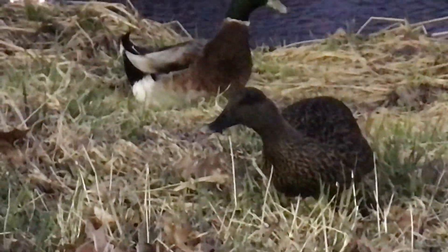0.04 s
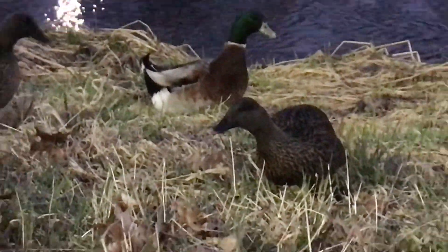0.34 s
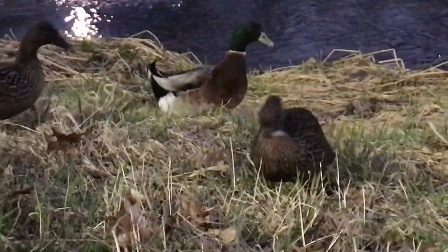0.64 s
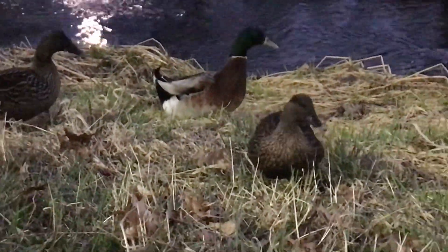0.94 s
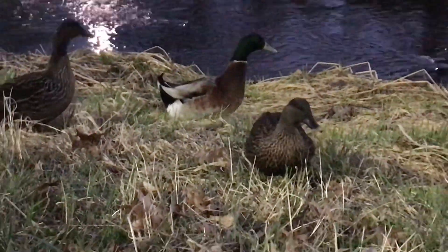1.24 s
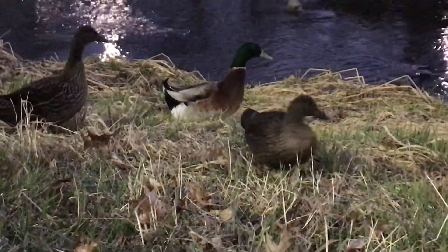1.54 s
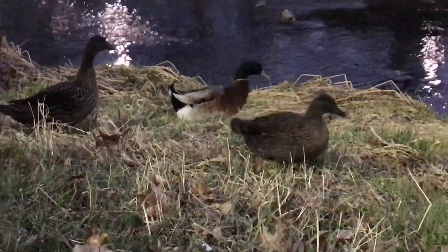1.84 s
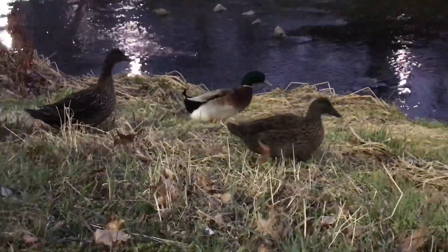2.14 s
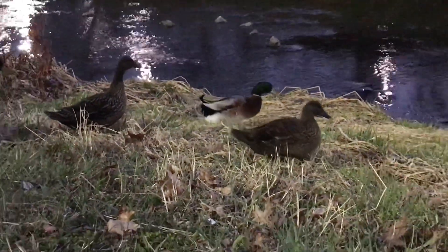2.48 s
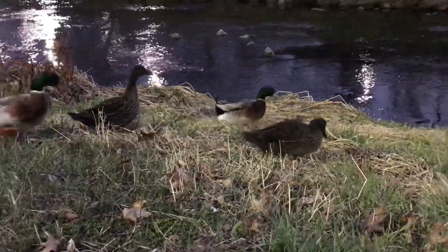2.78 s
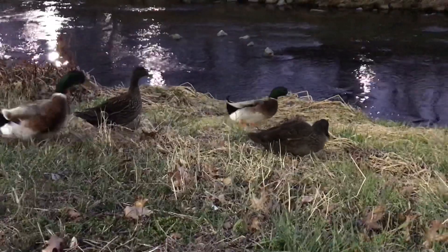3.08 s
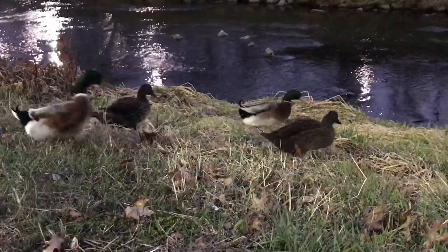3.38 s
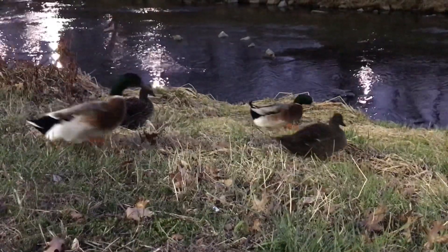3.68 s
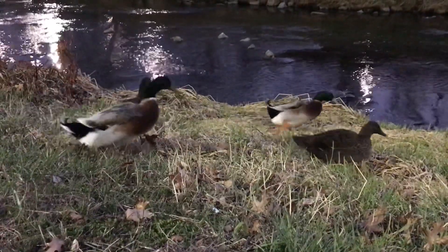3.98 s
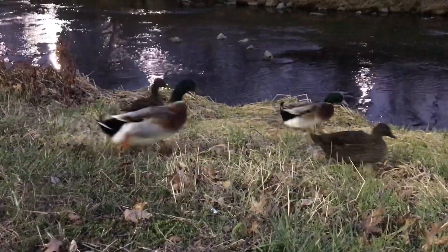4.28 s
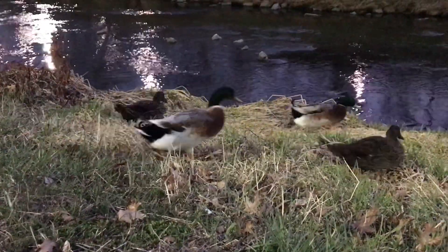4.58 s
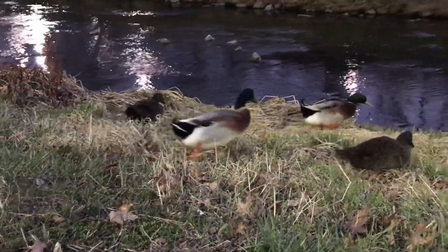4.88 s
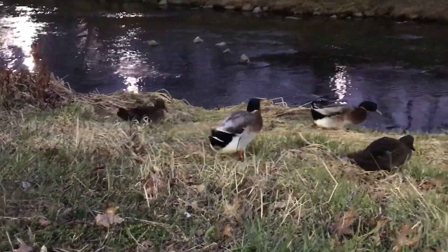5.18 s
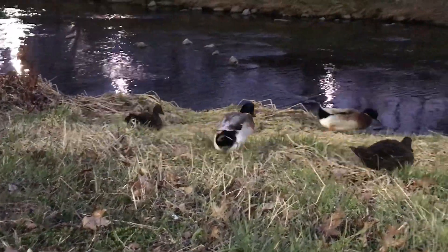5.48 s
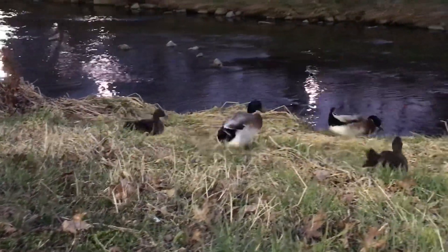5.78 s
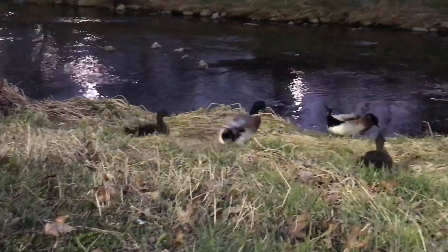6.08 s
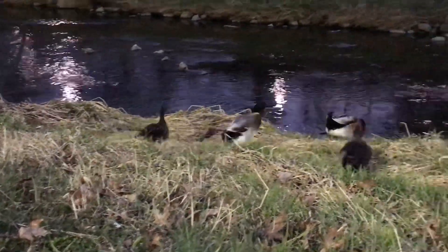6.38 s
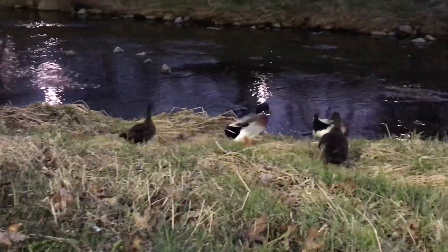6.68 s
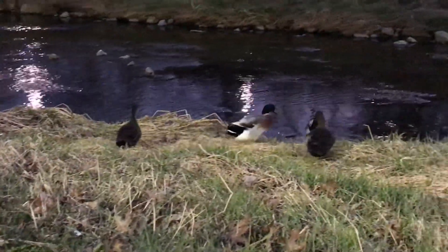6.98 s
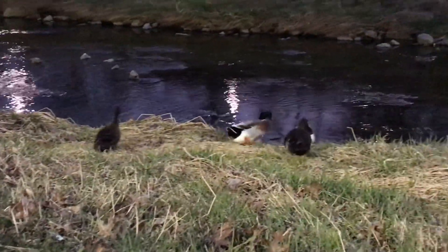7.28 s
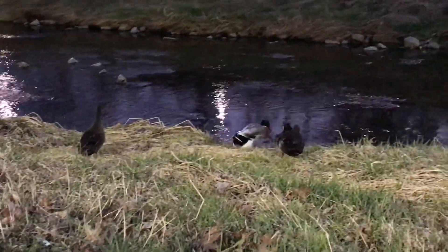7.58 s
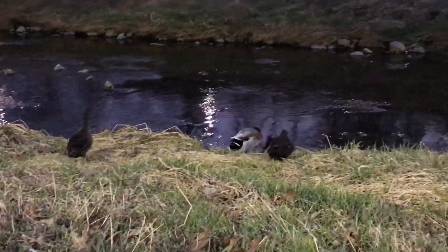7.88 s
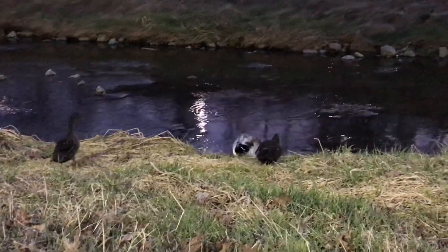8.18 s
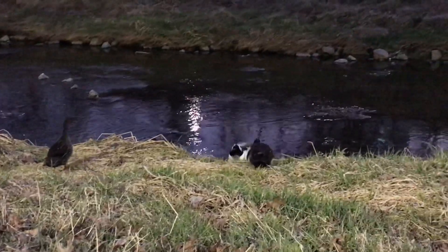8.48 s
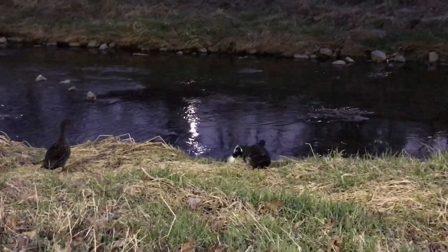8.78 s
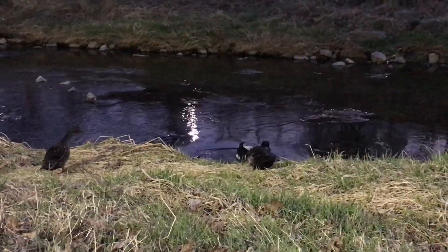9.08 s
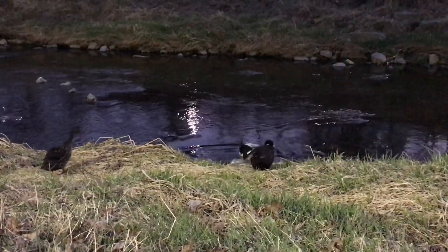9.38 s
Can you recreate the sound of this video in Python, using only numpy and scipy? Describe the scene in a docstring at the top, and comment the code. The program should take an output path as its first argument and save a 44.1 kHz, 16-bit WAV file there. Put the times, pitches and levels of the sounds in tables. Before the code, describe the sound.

A stream murmurs under a low outdoor rumble for the whole nine seconds or so, both easing slightly. At the start a far engine drones beneath a thin hiss; it fades out by about 3.6 seconds, and the hiss then drops back. Dry grass rustles and stalks snap as ducks walk about. From around 0.4 seconds the ducks give short, rattling, nasal clucks at uneven intervals, mixed with soft peeps, most with a low note and an overlapping higher one. Small birds chip faintly between 1 and 2 seconds and again from about 6 seconds. Steps and clucks are strongest around 4 to 5 seconds, with the sharpest snap just after 4 seconds and a few soft bumps near 4.5. After 6 seconds the rustling thins out, and the clucks and peeps grow quieter toward the end.

```python
"""Mallards chat on a grassy stream bank, over murmuring water and a low outdoor rumble.
At first a far engine drones under a thin hiss, dry grass rustles and snaps as the ducks walk, and
they start to call: clucks (quick rattles of tiny whistles) and soft peeps, most with two voices.
From about 1 s small birds chip now and then. The engine fades out by 3.6 s, then the hiss eases.
Steps and clucks are strongest around 4 to 5 s and grow quieter toward the end."""
import sys
import numpy as np
from scipy import signal
from scipy.fft import rfft, irfft, next_fast_len
from scipy.io import wavfile
from scipy.ndimage import uniform_filter1d, map_coordinates

SR = 44100
rng = np.random.default_rng(int(sys.argv[2]) if len(sys.argv) > 2 else 0)


def int16_out(signal):
    """Quantize to a 16-bit WAV file."""
    q = np.round(np.clip(np.atleast_2d(signal).T, -1, 1) * 32767)
    wavfile.write(sys.argv[1], SR, q.astype(np.int16))


N = 416289


# each cluck: (middle [s], rough length [s], relative level [dB], centre pitch [Hz], nasal boost [dB])
CLUCKS = [(0.436, 0.058, -51.5, 2400, -7.5), (0.937, 0.059, -46, 2190, -10),
          (1.183, 0.057, -43.5, 2424, -10), (1.913, 0.038, -47, 1904, -9), (2.473, 0.077, -45.5, 1912, -17),
          (2.56, .16, -50, 1890, -15), (2.704, .07, -39, 2560, -16), (3.244, 0.06, -44.5, 2360, -16),
          (3.354, .045, -45.5, 2140, -25), (3.63, 0.07, -41.5, 2083, -19), (3.866, .072, -41.5, 1910, -13),
          (4.153, .045, -47.5, 1885, -20), (4.308, 0.048, -41, 1920, -12), (4.407, 0.062, -45, 2270, -9),
          (4.554, 0.077, -40, 1953, -12), (4.912, .065, -41.5, 1948, -8), (4.975, 0.062, -41, 1960, -14),
          (5.157, 0.059, -42, 1936, -3.5), (5.209, 0.087, -42, 2000, -16), (5.601, 0.066, -45.5, 2200, -18),
          (5.662, 0.037, -48, 1910, -6), (5.829, 0.08, -44, 2050, -10), (5.909, .058, -49.5, 1976, 0.5),
          (6.179, 0.067, -45, 1925, -15), (6.411, 0.068, -41.5, 1990, -17), (6.668, .066, -49.5, 2275, -11),
          (6.821, 0.072, -46, 1940, -11.5), (7.055, 0.075, -45.5, 2036, -24),
          (7.454, 0.06, -49.5, 1890, -10), (7.701, 0.053, -48, 1906, -11), (8.054, .035, -54, 2010, -10),
          (8.419, 0.034, -53, 1956, -17), (8.856, 0.1, -52.5, 1927, -11)]
# how a duck's throat and bill colour a cluck: (frequency [Hz], level [dB])
THROAT = [(600, -32), (1200, 1.5), (1600, 7), (2000, 1.5), (2400, 0), (2900, 0), (3400, -5.5), (3900, -3),
          (4600, -25), (6500, -34), (10000, -45)]
# the high, nasal ring of a cluck: (frequency [Hz], level [dB])
NASAL_RING = [(2000, -27), (3200, -2.5), (3900, -3.5), (4700, -2), (5100, -1), (5400, 1), (5800, -4),
              (6300, -10), (7500, -26), (12000, -40)]
def clucks(pulses_per_s=87, sweep_octaves=0.88, rasp=0.46, gain_db=-6.5, nasal_db=-4):
    """The duck's voice box opens about 90 times a second; each opening is a tiny rising whistle."""
    out = np.zeros(N)
    usual_hz = np.median(np.array(CLUCKS)[:, 3])
    for middle, length, db, hz, ring_db in CLUCKS:
        rate = pulses_per_s * (1 + .03 * rng.standard_normal())
        half = int(.72 * length * SR)
        t = np.arange(-half, half) / SR
        n = len(t)
        effort = np.cos(np.pi * t / (t[-1] - t[0])).clip(0)
        # each pulse opens faster than it closes, and no two are quite alike
        cycle = (t * rate + .5 + .07 * wobble(90, n)) % 1
        opening = np.sin(np.pi * cycle ** .87) ** .96 * amp(2.6 * wobble(138, n))
        # higher calls sweep further; more effort tightens the voice box and lifts the pitch
        sweep = sweep_octaves * hz / usual_hz * (cycle - .45)
        lift = .294 * (effort - .7)
        shake = .0897 * wobble(109.2, n) + .081 * wobble(443, n)
        phase = turns(hz * 2 ** (sweep + lift + shake))
        # higher calls come from a wider bill, which makes the throat ring higher
        throat = np.array(THROAT) * [(hz / usual_hz) ** .13, 1]
        breath = unit(coloured(rng.standard_normal(n), throat))
        body = unit(coloured((np.sin(phase) + rasp * breath) * opening * effort ** 1.4, throat))
        # an overtone and rushing air ring high in the bill at the peak of the call
        airy_tone = .14 * np.sin(2 * phase) + rng.standard_normal(n)
        ring = unit(coloured(airy_tone * opening ** .98 * effort ** 2.3, NASAL_RING))
        add(out, middle + t[0], amp(db + gain_db) * (body + amp(ring_db + nasal_db) * ring))
    return out


# two-voiced peeps: (start [s], low note's rough length [s], its pitch [Hz], its relative level [dB],
# high note's relative level [dB], brightness [dB per octave])
PEEPS = [(.675, 0.05, 840, -59, -58, -8), (2.13, 0.055, 855, -51.5, -50.5, -2.5),
         (2.705, 0.051, 883, -50.5, -52, -2), (2.993, .063, 877, -48.5, -49, -1.5),
         (3.356, 0.053, 937, -52.5, -51, 7), (3.921, 0.053, 865, -52.5, -56, 0.5),
         (4.452, 0.065, 925, -51, -54, 4), (4.793, 0.053, 950, -58, -53.5, 12),
         (5.271, 0.057, 910, -57, -53, 9), (7.357, 0.055, 846, -54, -53.5, -1),
         (7.648, 0.062, 832, -52.5, -61, -1), (7.999, 0.057, 875, -52, -61, 2),
         (8.352, 0.058, 860, -54, -57, 2.5), (8.749, .048, 860, -57, -55, 3),
         (9.06, 0.064, 840, -57.5, -59.5, 3)]
# one voice alone:
# (start [s], rough length [s], pitch [Hz], relative level [dB], brightness [dB per octave])
LONE_PEEPS = [(1.584, 0.04, 849, -59, -11), (1.845, .068, 1015, -48, -6), (5.971, 0.036, 1053, -56, 0),
              (6.876, 0.058, 898, -51, 1)]
def peeps(high_hz=1190):
    """One side of the voice box sings and the other joins late and higher; sometimes one sings alone."""
    # pitch at the start, middle and end of a note, as multiples of its own pitch
    rising, arched, flat = (.945, 1, 1.045), (.86, 1, .77), (1.03, 1, .985)
    out = np.zeros(N)
    for start, length, hz, low_db, high_db, brightness in PEEPS:
        add(out, start, peep_note(length, hz, rising, low_db, brightness))
        add(out, start + .7 * length, peep_note(.82 * length, high_hz, arched, high_db, brightness))
    for start, length, hz, db, brightness in LONE_PEEPS:
        add(out, start, peep_note(length, hz, flat, db, brightness))
    return out


# how the nearly closed bill colours a peep: (frequency [Hz], level [dB])
BILL = [(700, -25), (870, -7.5), (1150, 1), (1750, 0), (2350, -5), (2650, -8.5), (3500, -22.5), (4700, -42)]
def peep_note(length, hz, shape, db, brightness, rattle_hz=95, flutter_db=3, pivot_hz=1660):
    """One whistle and its overtones (multiples of its pitch) pass through the bill."""
    n = int(1.08 * length * SR)
    progress = np.linspace(0, 1, n)
    pitch = hz * np.polyval(np.polyfit([0, .5, 1], shape, 2), 1.08 * progress)
    # as the air runs out, the note sags, grows hoarse and breaks into a rattle
    tiring = progress ** 4
    sag = 1 - .216 * tiring ** 2
    rattle = .53 * tiring * np.sin(turns(rattle_hz * (1 + .11 * wobble(51, n))))
    waver = .014 * wobble(210, n)
    hoarseness = .038 * tiring * wobble(950, n)
    phase = turns(pitch * sag * (1 + waver + hoarseness + .18 * rattle))
    tone = np.zeros(n)
    for k in range(1, 5):
        tone += amp(along(BILL, k * hz) + brightness * np.log2(k * hz / pivot_hz)) * np.sin(k * phase)
    swell = np.abs(np.sin(np.pi * progress)) ** .5 * amp(db + flutter_db * wobble(140, n))
    return np.sqrt(2) * tone * swell * (1 + rattle)


# the tone colour of dry grass: (frequency [Hz], level [dB])
DRY_GRASS = [(1470, -29), (2500, -6), (3060, -1.5), (4220, -1.5), (4890, -5), (5240, -2.5), (7250, -1),
             (7650, -3.5), (9210, -0.5), (10300, -2.5), (12800, -2), (15800, -5.5)]
def grass(cracks_per_s=800, gain_db=2):
    """Blades brush in a hiss while tiny cracks, each with its own pitch, run through the straw."""
    t = np.arange(64) / SR
    when, pitch, size = rng.random((int(cracks_per_s * N / SR), 3)).T[:, :, None]
    hz = 4500 + 11000 * pitch
    strength = amp(-6 * np.log(size + .021))  # many faint cracks, a few loud ones
    cracks = strength * np.sin(2 * np.pi * hz * t) * np.exp(-t * hz / 2)
    positions = (when * N).astype(int) + np.arange(len(t))
    crackle = np.bincount(positions.ravel(), cracks.ravel(), N)[:N]
    rustle = .84 * unit(crackle) + 2.12 * rng.standard_normal(N)
    flicker = amp(1.7 * wobble(70))
    return amp(gain_db) * treading() * unit(coloured(rustle * flicker, DRY_GRASS))


# steps and shuffles: (loudest moment [s], rough length [s], relative level [dB])
STEPS = [(0.11, 0.13, -62.5), (.89, 0.13, -65), (1.096, 0.069, -64), (1.365, 0.22, -61.5),
         (2.11, 0.24, -66), (2.427, .16, -67), (2.89, 0.15, -60.5), (3.353, 0.22, -58.5),
         (3.544, 0.17, -56), (3.729, 0.15, -54), (4.059, 0.09, -51), (4.128, 0.15, -52),
         (4.398, 0.12, -51.5), (4.49, 0.11, -52.5), (4.8, 0.18, -54.5), (4.93, 0.15, -55.5),
         (5.052, .09, -55), (5.318, 0.33, -59), (5.568, 0.17, -53), (5.816, 0.14, -57.5), (6.23, 0.14, -68),
         (6.453, 0.11, -64.5), (6.58, .17, -64), (6.868, 0.066, -63), (7.022, 0.22, -69), (8.32, .1, -68)]
# the flock's constant stirring in the grass: (time [s], relative level [dB])
STIRRING = [(0, -64.5), (.75, -73.5), (1.6, -65.5), (2.25, -72), (2.65, -67), (4, -65), (4.7, -57.5),
            (5.45, -62), (6.05, -63.5), (7.25, -66), (8.1, -73.5), (9.44, -75)]
def treading(press_share=0.26, settle_share=0.7):
    """How hard the grass is stirred: each foot presses down quickly, then the straw settles."""
    t = np.arange(N) / SR
    stir_db, = curves(STIRRING)
    power = amp(stir_db) ** 2
    for peak, length, db in STEPS:
        width = length * np.where(t < peak, press_share, settle_share)
        step = amp(db) * np.exp(-((t - peak) / width) ** 2)
        power += step ** 2
    return np.sqrt(power)


# breaking stalks: (time [s], relative level [dB], ring pitch [Hz])
SNAPS = [(0.0983, -31.5, 4130), (.182, -33.5, 4630), (.2585, -38.5, 11600), (0.3464, -42, 2980),
         (.5, -35, 2640), (0.5624, -35, 3960), (.597, -42, 3060), (.884, -37, 3072), (1.289, -38, 2820),
         (1.4316, -28.5, 12300), (1.6538, -30.5, 2700), (2.88, -34, 12300), (2.9637, -33, 4600),
         (3.333, -35, 12000), (3.7736, -26.5, 12200), (4.129, -27, 12800), (4.144, -19, 12600),
         (4.181, -29, 7090), (4.417, -25, 3900), (4.9473, -26.5, 2890), (5.521, -27, 3670),
         (5.5943, -30, 9590), (7.1442, -39, 7150), (9.205, -44, 2570)]
def snaps(crack_s=0.0057, tail_s=0.022, gain_db=-3):
    """A stalk breaks with a sharp crack and a very brief ring."""
    out = np.zeros(N)
    t = np.arange(SR // 25) / SR
    for start, db, hz in SNAPS:
        burst = rng.standard_normal(len(t)) * (amp(-60 * t / crack_s) + .24 * amp(-60 * t / tail_s))
        crack = signal.lfilter(*signal.butter(2, 2300, "high", fs=SR), burst)
        ring = signal.lfilter(*signal.iirpeak(hz, Q=4, fs=SR), burst)
        snap = unit(crack) + .59 * unit(ring)
        add(out, start, amp(db + gain_db) * snap / np.abs(snap).max())
    return out


# low bumps: (start [s], length [s], first pitch [Hz], last pitch [Hz], level [dB], pitch shake [share])
BUMPS = [(.3, 0.243, 61, 62.6, -38.5, .05), (4.468, 0.024, 193, 131, -36, 0.35),
         (4.51, 0.037, 106, 124, -35.5, 0.15), (4.51, 0.031, 253, 222, -39, 0.37),
         (7.775, 0.053, 242, 416, -48.5, 0.033)]
def bumps():
    """Soft bumps and plops: short, low tones that slide in pitch."""
    return glides(BUMPS)


# bird calls: (start [s], length [s], first pitch [Hz], last pitch [Hz], level [dB], pitch shake [share])
BIRD_CHIPS = [(1.2, 0.074, 3150, 3100, -59, 0.0091), (1.3, 0.16, 3560, 3700, -62, 0.034),
              (1.41, 0.12, 2120, 2080, -56.5, 0.033), (1.785, 0.044, 4150, 3960, -58, .015),
              (5.93, 0.12, 5360, 5460, -57, 0.16), (6.53, 0.22, 3950, 4010, -59.5, 0.1),
              (6.55, 0.18, 2900, 2960, -59, 0.032), (7.76, 0.063, 3770, 3570, -60, .09),
              (7.74, 0.18, 5700, 6100, -65.5, 0.064), (8.26, 0.16, 6700, 6500, -66, 0.062),
              (8.59, 0.091, 6100, 6200, -64.5, 0.092), (8.94, 0.03, 5970, 6370, -59.5, 0.054),
              (9.29, 0.076, 6100, 6260, -64, 0.1)]
def small_birds():
    """Small birds give short, high chips, some clear and some hoarse."""
    return glides(BIRD_CHIPS)


# how long the echo lasts: (frequency [Hz], time to fade by 60 dB [s])
ECHO_FADE = [(300, 0.1), (2000, 0.21), (10000, 0.051)]
def bank_echo(calls, delay_samples=300):
    """The ground and the far bank scatter the calls back as a thin echo."""
    hz, t, noise = signal.stft(rng.standard_normal(SR // 2), SR, nperseg=256)
    fade = amp(-60 * t / along(ECHO_FADE, hz)[:, None])
    tail = signal.istft(noise * fade, SR, nperseg=256)[1]
    return signal.fftconvolve(np.pad(calls, (delay_samples, 0)), tail / np.linalg.norm(tail))[:N]


# the far engine: (time [s], firing rate [Hz], overall level [dB], brightness [dB per octave])
ENGINE = [(0, 47.9, -51.5, 0), (.6, 49, -49.5, 1), (.95, 49.7, -46.5, -3), (1.3, 50.5, -48, -1.5),
          (1.8, 51.6, -45, -5), (2.1, 51.2, -55.5, 4), (2.5, 50.7, -53.5, 4), (3, 48.5, -57.5, 3),
          (3.6, 48, -85, 0)]
# the tones of its exhaust: (multiple of the firing rate [number], relative level [dB])
EXHAUST_TONES = [(2, -0.5), (3, -2.5), (4, -13.5), (5, -15.5), (6, -11), (7, -13), (8, -20)]
def engine(waver_db=2.5):
    """Only the low tones of the exhaust carry this far, each fading in and out."""
    firing_hz, db, brightness = curves(ENGINE)
    phase = turns(firing_hz * (1 + .0055 * wobble(12)))
    drone = np.zeros(N)
    for k, tone_db in EXHAUST_TONES:
        drone += amp(tone_db + brightness * np.log2(k / 2) + waver_db * wobble(9)) * np.sin(k * phase)
    return amp(db) * drone


# the tone colour of the steady rumble: (frequency [Hz], level [dB])
RUMBLE_COLOUR = [(13, -58), (22, -34), (43, -5.5), (64, 0), (114, -10), (141, -9), (166, -18.5), (186, -16),
                 (258, -25.5), (354, -25), (450, -35.5), (580, -72), (990, -120)]
# swells of the deepest rumble: (middle [s], half length [s], level [dB])
SWELLS = [(2.5, 0.11, -47), (3.1, 0.12, -55), (5.695, 0.22, -47.5), (7.68, 0.34, -49)]
# the tone colour of those swells: (frequency [Hz], level [dB])
SWELL_COLOUR = [(15, -44), (30, -8), (55, 0), (75, -4), (110, -20), (250, -50), (600, -110)]
def rumble(start_db=-44, fade_db_per_s=0.22):
    """A low outdoor rumble slowly fades, with a few deep swells."""
    t = np.arange(N) / SR
    steady = amp(start_db - fade_db_per_s * t - .05 * wobble(7.8))
    swells = sum(amp(db) * np.exp(-((t - middle) / half) ** 2) for middle, half, db in SWELLS)
    return steady * rush(RUMBLE_COLOUR, patchy_db=.4) + swells * rush(SWELL_COLOUR, patchy_db=-1.7)


# the tone colour of the water: (frequency [Hz], level [dB])
WATER_COLOUR = [(150, 3), (300, -1.5), (440, -3.5), (700, -1), (1000, 1.8), (1300, -1.5), (1700, -3),
                (2200, -10.5), (3000, -19), (4500, -23), (6300, -24.5), (9000, -35.5), (15000, -29.5)]
def stream(start_db=-52.5, fade_db_per_s=0.18):
    """Running water murmurs and slowly gets a little quieter."""
    t = np.arange(N) / SR
    return amp(start_db - fade_db_per_s * t) * rush(WATER_COLOUR, patchy_db=1.18)


# how loud the distant hiss is: (time [s], level [dB])
HISS_LEVEL = [(0, -68), (1.4, -66.5), (2.9, -66.5), (4.5, -71.5), (9.44, -71.5)]
# its tone colour: (frequency [Hz], level [dB])
HISS_COLOUR = [(1200, -33), (2200, -6), (2800, -0.5), (3300, -1), (3700, -10), (4500, -10.5), (7000, -40)]
def distant_hiss():
    """A thin, high hiss far away drops back after the first three seconds."""
    db, = curves(HISS_LEVEL)
    return amp(db) * rush(HISS_COLOUR, patchy_db=3.5)


def glides(rows):
    """Short, soft-edged tones that slide in pitch; shaking the pitch fast makes them hoarse."""
    out = np.zeros(N)
    for start, length, first_hz, last_hz, db, shake in rows:
        n = int(length * SR)
        pitch = np.linspace(first_hz, last_hz, n) * (1 + shake * wobble(800, n))
        add(out, start, amp(db) * np.hanning(n) * np.sin(turns(pitch)))
    return out


def rush(colour, patchy_db):
    """Rushing noise with random louder and softer patches across pitch and time."""
    noise = signal.stft(rng.standard_normal(N), nperseg=512)[2]
    patches = uniform_filter1d(rng.standard_normal(noise.shape), 4, axis=0)
    patches = uniform_filter1d(patches, 10, axis=1)
    uneven = signal.istft(noise * amp(patchy_db * unit(patches)), nperseg=512)[1][:N]
    return unit(coloured(uneven, colour))


def amp(db):
    """Turn decibels into a number to multiply a sound by."""
    return 10 ** (np.asarray(db) / 20)


def unit(x):
    """Scale a sound to an average strength (rms) of 1."""
    return x / np.sqrt(np.mean(x ** 2) + 1e-20)


def along(points, hz):
    """Read between (frequency, value) points, with octaves evenly spaced."""
    frequencies, values = np.transpose(points)
    return np.interp(np.log(hz + 1), np.log(frequencies + 1), values)


def curves(rows):
    """Turn each column after the time into one value per sample."""
    times, *columns = np.transpose(rows)
    return [np.interp(np.arange(N) / SR, times, column) for column in columns]


def wobble(rate, size=N):
    """A smooth curve through `rate` random points a second."""
    points = rng.standard_normal(int(size * rate / SR) + 4)
    return map_coordinates(points, [np.arange(size) * rate / SR])


def filtered(x, response):
    """Multiply each frequency in a sound by response(frequency)."""
    size = next_fast_len(len(x) + 8192)
    return irfft(rfft(x, size) * response(np.fft.rfftfreq(size, 1 / SR)), size)[:len(x)]


def coloured(x, colour):
    """Give a sound the tone colour of a (frequency [Hz], level [dB]) table."""
    return filtered(x, lambda hz: amp(along(colour, hz)))


def turns(hz):
    """The phase (angle turned so far) of a tone whose pitch moves."""
    return 2 * np.pi * np.cumsum(hz) / SR


def add(track, start, sound):
    """Mix a sound into the track at `start` seconds."""
    i = max(0, round(start * SR))
    track[i:i + len(sound)] += sound[:max(0, N - i)]


def scene(echo_db=-17):
    """Ducks and birds with their echo, over the grass and the background, in one channel."""
    calls = clucks() + peeps() + small_birds()
    ground = grass() + snaps() + bumps()
    echo = amp(echo_db) * bank_echo(calls)
    background = engine() + rumble() + stream() + distant_hiss()
    return (calls + echo + ground + background)[None]


# the microphone's narrow dip in the treble: (frequency [Hz], level [dB])
TREBLE_DIP = [(9700, 0), (10400, -4), (11200, 0)]
def record(dry, top_hz=15900):
    """The microphone softens a narrow band of treble, and everything above top_hz is cut."""
    return np.array([filtered(coloured(channel, TREBLE_DIP), lambda hz: hz < top_hz) for channel in dry])


dry = scene()
out = record(dry)
int16_out(out)
```